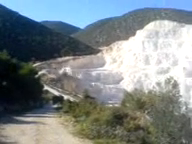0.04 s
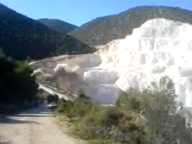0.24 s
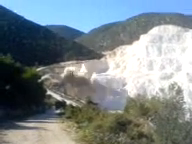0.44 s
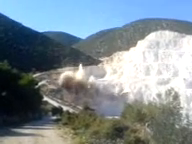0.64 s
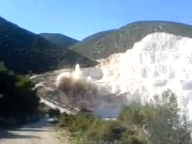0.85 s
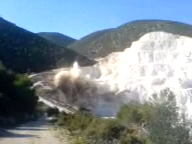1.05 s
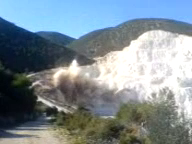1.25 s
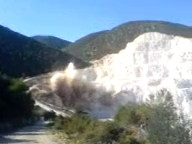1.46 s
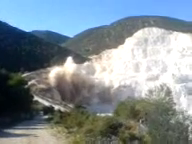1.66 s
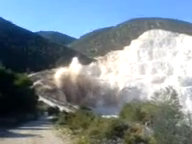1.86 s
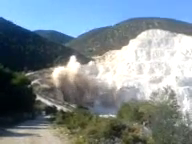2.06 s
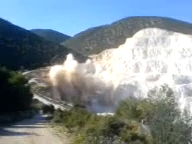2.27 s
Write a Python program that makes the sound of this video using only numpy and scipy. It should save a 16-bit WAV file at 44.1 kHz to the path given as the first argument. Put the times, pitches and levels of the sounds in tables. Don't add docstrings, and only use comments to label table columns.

```python
import sys
import numpy as np
from scipy import signal
from scipy.fft import rfft, irfft, next_fast_len
from scipy.io import wavfile
from scipy.ndimage import uniform_filter1d, map_coordinates

SR = 44100
rng = np.random.default_rng(int(sys.argv[2]) if len(sys.argv) > 2 else 0)


def log_audio(samples):
    frames = np.atleast_2d(samples).T
    limited = np.clip(frames, -1, 1)
    pcm = np.round(limited * 32767).astype(np.int16)
    wavfile.write(sys.argv[1], SR, pcm)


def boost_factor(decibels):
    exponent = np.asarray(decibels, float) / 20
    return 10 ** exponent


N = 101430


def along(points, hz):
    f, value = np.transpose(points)
    return np.interp(np.log(hz + 1), np.log(f + 1), value)


def curves(rows):
    s, *columns = np.transpose(rows)
    return [np.interp(np.arange(N) / SR, s, column) for column in columns]


def coloured(x, spectrum):
    size = 2 * next_fast_len(N // 2 + 4096)
    gain = boost_factor(along(spectrum, np.fft.rfftfreq(size, 1 / SR)))
    cepstrum = irfft(np.log(gain), size)
    cepstrum[1:size // 2] *= 2
    cepstrum[size // 2 + 1:] = 0
    response = np.exp(rfft(cepstrum))
    return irfft(rfft(x, size) * response, size)[:N]


def wobble(rate):
    return map_coordinates(rng.standard_normal(900), [np.arange(N) * rate / SR])


def debris(spectrum, rate, spread_db, patchy_db, lumpy_db):
    chance, side, size = rng.random((3, N))
    strength = boost_factor(-spread_db * np.log(size + 1e-9))
    hits = (chance < rate / SR) * np.sign(side - .5) * strength
    z = signal.stft(hits, nperseg=512)[2]
    field = uniform_filter1d(rng.standard_normal(z.shape), 4, 0)
    field = uniform_filter1d(field, 5, 1)
    patchy = signal.istft(z * boost_factor(patchy_db * field / field.std()), nperseg=512)[1][:N]
    x = coloured(patchy * boost_factor(lumpy_db * wobble(45.08)), spectrum)
    return x / x.std()


def pulses(rows, cycles):
    t = np.clip(np.arange(N) / SR - np.array(rows)[:, :1], 0, None)
    _, db, hz = np.transpose(rows)[:, :, None]
    swings = boost_factor(db - 60 * t * hz / cycles) * np.sin(2 * np.pi * hz * t)
    return -swings.sum(0)


# start in [s], length in [s], crack in [dB], boom in [dB].
FRONT_ARRIVALS = [(0.239, 0.013, -4, -12), (0.328, 0.087, -6, -42), (0.418, 0.11, -1.5, -23),
                  (0.454, 0.1, -3.5, -19), (0.617, 0.049, -4.5, -25), (0.68, 0.041, 0, -35),
                  (0.738, 0.056, 0.5, -16.5), (0.801, 0.061, 0.5, -4.5), (0.853, 0.028, -38, 5),
                  (0.898, 0.046, 3.5, -4.5), (0.987, 0.041, -4, 3), (1.084, 0.021, -3, -6),
                  (1.116, .06, -27, -6.5), (1.202, 0.038, -3, -2), (1.247, 0.064, -5.5, -10),
                  (1.291, 0.066, -9.5, -7), (1.405, 0.041, -12.5, -9), (1.442, 0.029, -14.5, -14.5),
                  (0.548, .04, -7, -16), (1.046, 0.041, -11.5, -5.5), (1.554, 0.026, -19, -15.5),
                  (1.608, 0.086, -22.5, -15.5)]
# frequency in [Hz], density in [dB per Hz].
CRACK_COLOUR = [(50, -37.5), (350, -11.5), (760, -1), (1200, -6), (1750, -2), (2100, -9.5), (2700, -17),
                (3700, -18.5)]
# frequency in [Hz], density in [dB per Hz].
BOOM_COLOUR = [(35, -33.5), (80, -14.5), (170, -6.5), (280, 2.5), (600, -3), (1500, -11), (2800, -28.5),
               (3700, -36.5)]


def blast():
    rise_s, fall_s = .008, 0.013
    t = np.arange(N) / SR
    s, length, crack_db, boom_db = np.transpose(FRONT_ARRIVALS)[:, :, None]
    rise = np.clip((t - s) / rise_s, 0, 1) ** 2
    fall = np.exp(-2 * np.clip(t - s - length, 0, None) / fall_s)
    power = rise * fall
    crack = np.sqrt((power * boost_factor(2 * crack_db)).sum(0))
    boom = np.sqrt((power * boost_factor(2 * boom_db)).sum(0))
    sharp = debris(CRACK_COLOUR, 3500, 1.2, 1.6, .3)
    deep = debris(BOOM_COLOUR, 1800, 1.2, 2, .8)
    return crack * sharp + boom * deep


# start in [s], peak in [dB], pitch in [Hz].
FIRST_PUSHES = [
    (.2168, -27, 750),
    (.2205, -10, 215),
    (.2255, -3, 620),
    (.2312, -1, 1600),
    (.229, -4, 235),
]


def first_shock():
    return pulses(FIRST_PUSHES, 14.0)


# start in [s], peak in [dB], pitch in [Hz].
STRAY_CRACKS = [
    (1.4815, 1.5, 800),
]


def stray_crack():
    return pulses(STRAY_CRACKS, 9)


# time in [s], level in [dB], share of deep rumble in [0-1].
VALLEY_ROAR = [(.216, -63, 0.5), (.222, -10.5, 0.4), (.25, -5, 0.18), (.55, -3.5, 0.01), (.87, -7, 0.31),
               (.893, -7, 0.6), (.91, -0.5, 0.68), (1.105, -2.5, 0.38), (1.123, -11, 0.5), (1.14, -4, 0.3),
               (1.36, -6.5, 0.28), (1.42, -8, 0.42), (1.51, -15, 0.65), (1.592, -17, 0.72),
               (1.66, -17.5, 0.47), (1.76, -19.5, 0.65), (2.0, -23, 0.34), (2.3, -26, 0.15)]


def valley():
    level_db, deep = curves(VALLEY_ROAR)
    deep = np.clip(deep, 0, 1)
    hiss = debris(CRACK_COLOUR, 5000, 1, 1.6, .3)
    rumble = debris(BOOM_COLOUR, 2500, 1, 2, .6)
    roar = np.sqrt(1 - deep) * hiss + np.sqrt(deep) * rumble
    started = np.arange(N) > VALLEY_ROAR[0][0] * SR
    return boost_factor(level_db) * roar * started


# start in [s], level in [dB], pitch in [Hz], 60 dB decay in [s].
PIT_HOLLOWS = [
    (0.246, -5, 766, 2.53),
    (0.461, 0, 1186, 0.75),
    (0.551, -8.5, 615, 1.5),
    (1.63, -15, 272, 0.23),
]
# frequency in [share of pitch], level in [dB].
HOLLOW_SHAPE = [(.4, -32.5), (.75, -12), (0.899, -1.5), (1.03, 0), (1.17, -13), (1.7, -30)]


def pit():
    out = np.zeros(N)
    for s, db, hz, t60 in PIT_HOLLOWS:
        t = np.clip(np.arange(N) / SR - s, 0, None)
        band = [(hz * share, rel_db) for share, rel_db in HOLLOW_SHAPE]
        swell = np.minimum(t / 0.0069, 1)
        decay = boost_factor(db - 60 * t / t60)
        out += swell * decay * debris(band, 2500, 1, 1, 0.56)
    return out


# time in [s], level in [dB].
ROCK_SLIDE = [
    (1.2, -45),
    (1.5, -26.5),
    (1.8, -26),
    (2.05, -23.5),
    (2.3, -19.5),
]
# frequency in [Hz], density in [dB per Hz].
STONE_COLOUR = [(60, -38), (700, -7.5), (1250, 1.5), (1780, 0.5), (2150, -6.5), (3050, -25.5), (3380, -8.5),
                (3620, -18.5)]


def rocks():
    level_db, = curves(ROCK_SLIDE)
    started = np.arange(N) > ROCK_SLIDE[0][0] * SR
    return boost_factor(level_db) * started * debris(STONE_COLOUR, 3000, 1.6, 1.3, .4)


# start in [s], peak in [dB], pitch in [Hz].
EARLY_KNOCK = [
    (.0748, -42, 950),
    (.0748, -44, 420),
]


def knock():
    return pulses(EARLY_KNOCK, 9)


# frequency in [Hz], density in [dB per Hz].
AIR_COLOUR = [(40, -34), (150, -14), (340, 2.5), (650, -4.5), (1200, -7), (2000, -8), (3300, -10),
              (3700, -24.5)]


def air():
    level_db = -55.5
    return boost_factor(level_db) * debris(AIR_COLOUR, 2100, 1.6, 2.7, .7)


def scene():
    explosion = blast() + first_shock() + stray_crack()
    answer = valley() + pit()
    background = rocks() + knock() + air()
    return (explosion + answer + background)[None]


# frequency in [Hz], gain in [dB].
CAPSULE_BAND = [(3000, -1), (3200, 1.5), (3370, 3), (3550, -1), (3800, -8.5), (4400, -29.5), (4650, -57.5),
                (4750, -110)]


def overloaded_microphone(x):
    ceiling, coupling_hz, top_hz = 0.69, 4, 15750
    x = np.clip(coloured(x, CAPSULE_BAND), -ceiling, ceiling)
    x = signal.lfilter(*signal.butter(1, coupling_hz, "high", fs=SR), x)
    top = signal.firwin(numtaps=201, cutoff=top_hz, window=("kaiser", 9), fs=SR)
    padded = np.pad(x, 100, "reflect", reflect_type="odd")
    return np.convolve(padded, top, "valid")


def band_limit(x):
    return signal.sosfilt(signal.butter(12, 16500, fs=SR, output="sos"), x)


def record(dry):
    mix = overloaded_microphone(dry[0])[None]
    return band_limit(mix)


dry = scene()
out = record(dry)
log_audio(out)
```